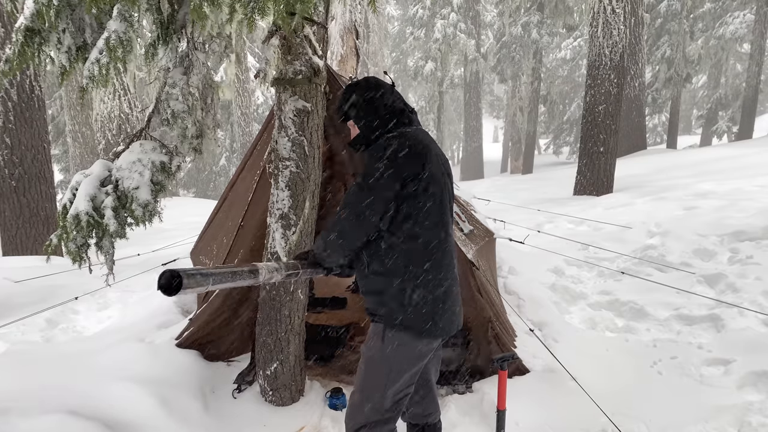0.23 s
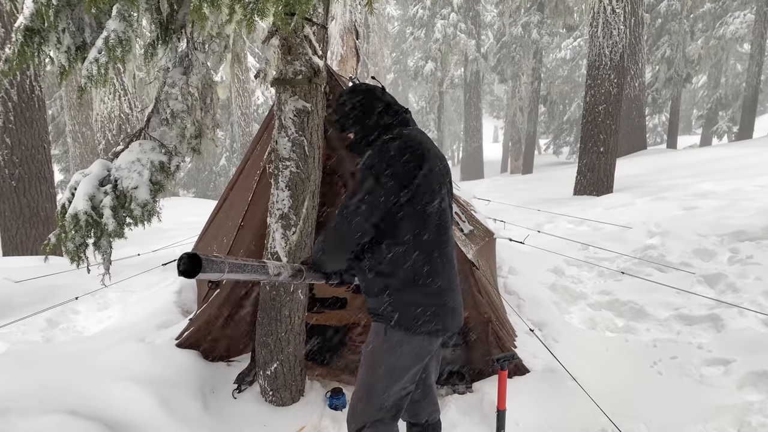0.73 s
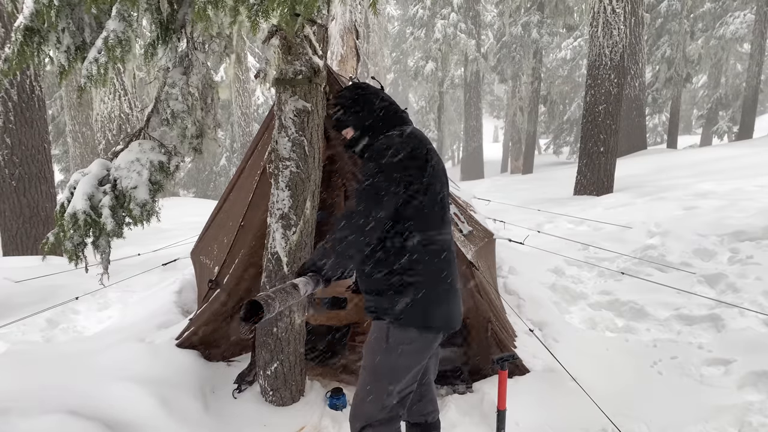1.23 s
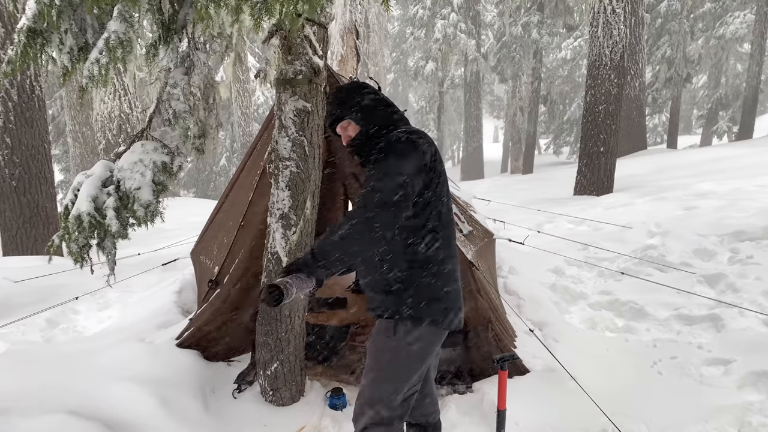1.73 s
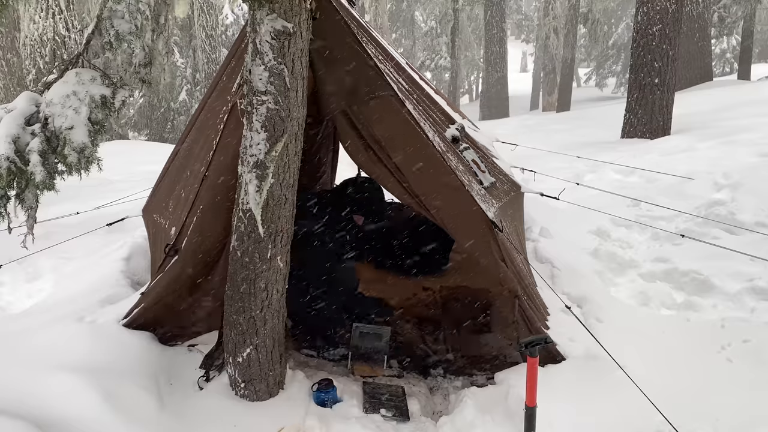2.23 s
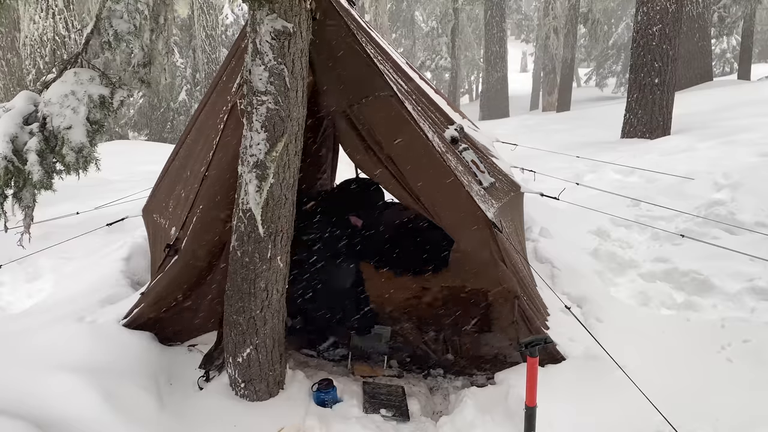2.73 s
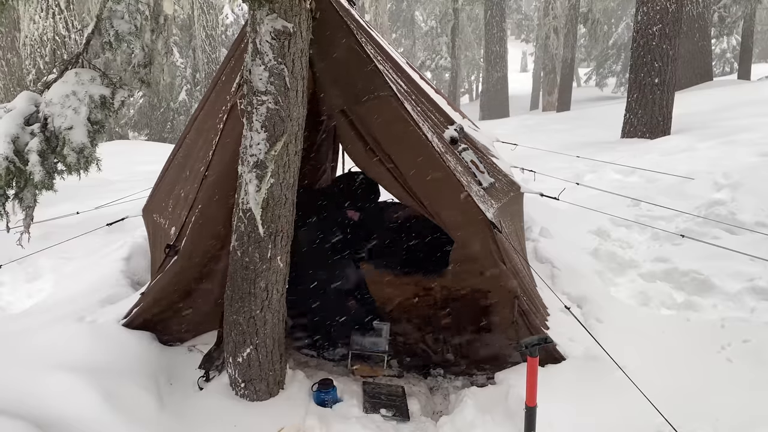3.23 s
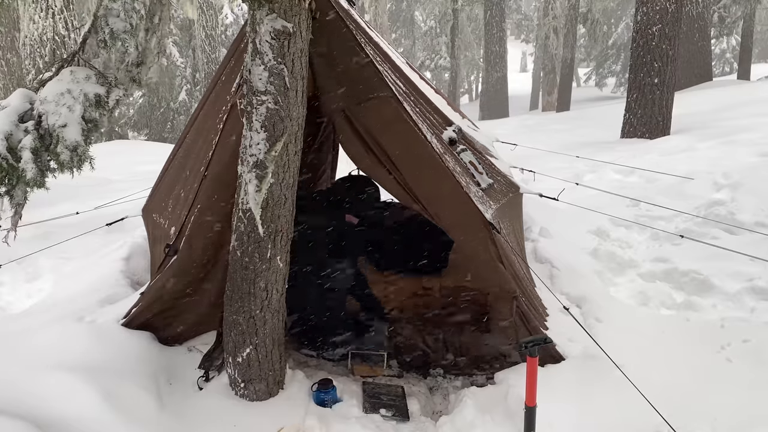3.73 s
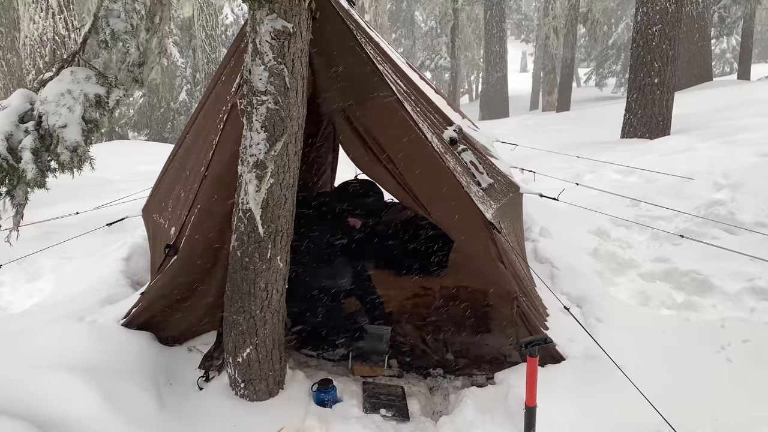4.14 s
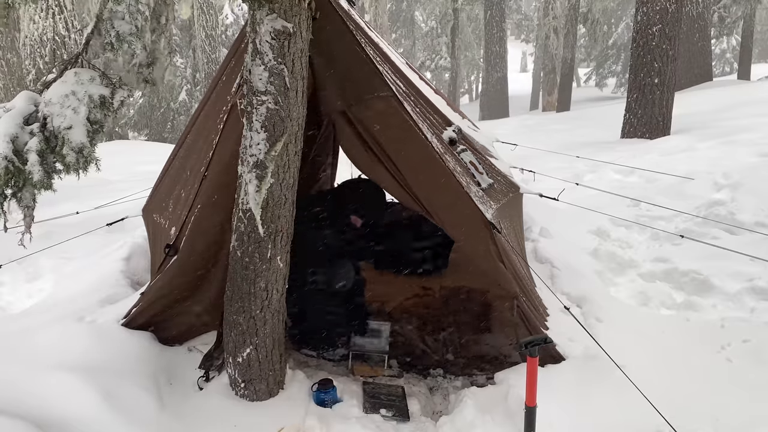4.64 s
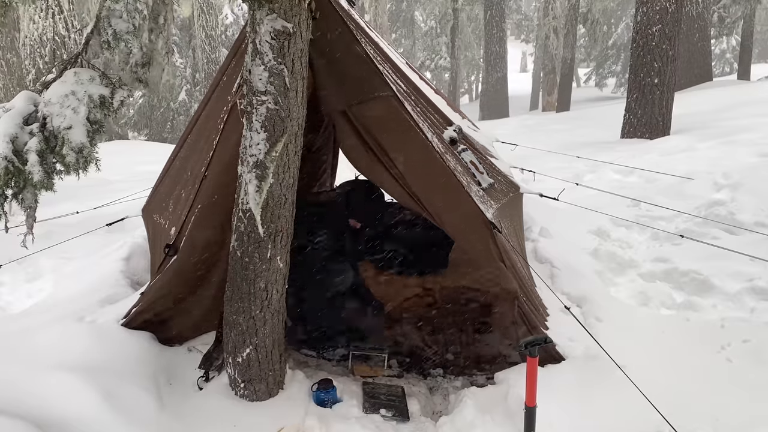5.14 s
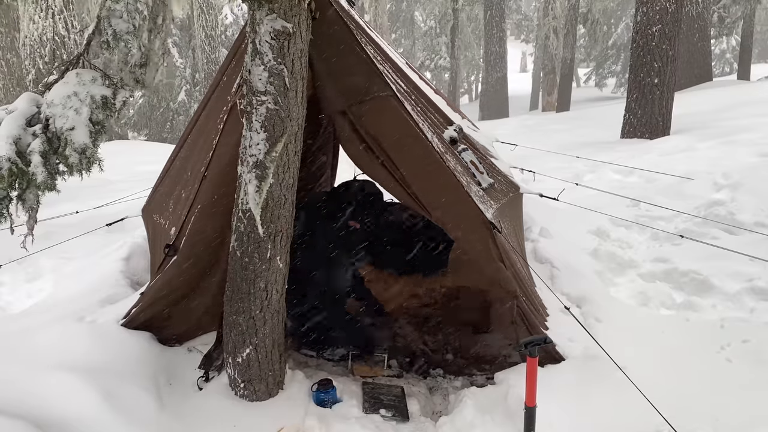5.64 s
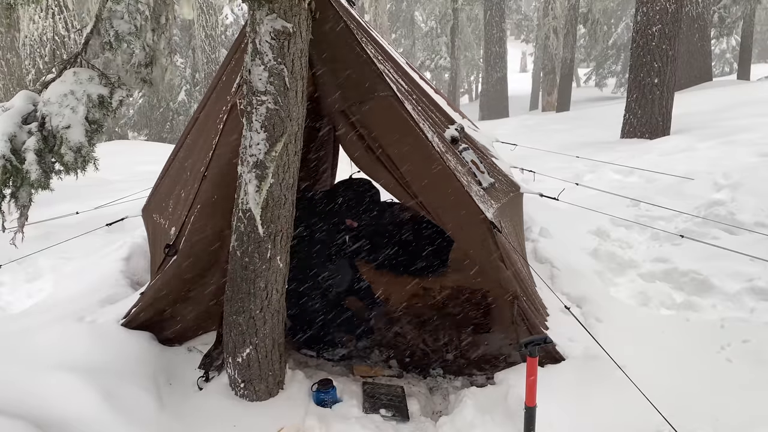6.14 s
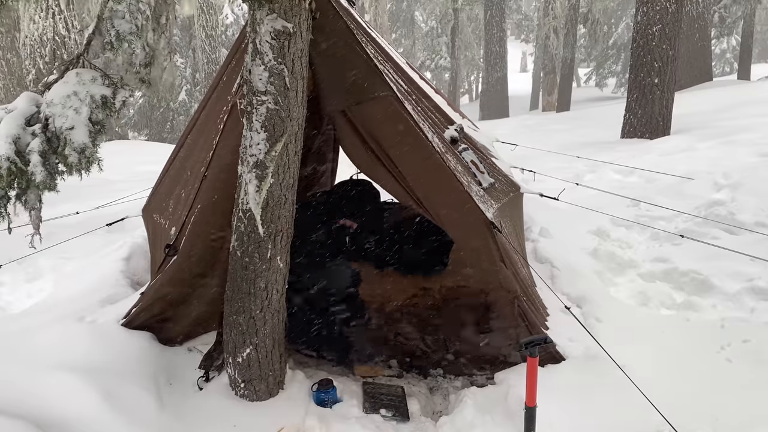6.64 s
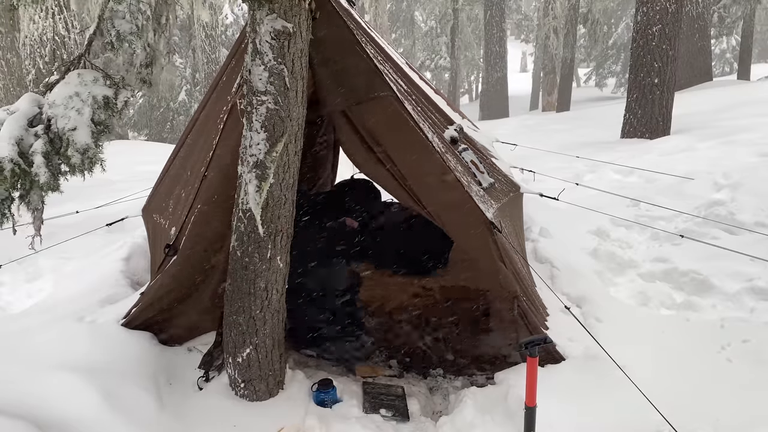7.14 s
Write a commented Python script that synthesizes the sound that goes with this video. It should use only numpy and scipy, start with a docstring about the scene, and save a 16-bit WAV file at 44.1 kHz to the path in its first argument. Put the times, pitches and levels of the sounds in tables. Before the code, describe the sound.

Tinny pipe scraping with sharp catches for two seconds, followed by woody cracks, hollow knocks and faint rustles amid hissing snow and low gusts.

```python
"""A thin steel stove pipe is slid into a tent in a snowy wood: stick-slip grains and catches ring its wall.
Then firewood is knocked about at the stove in the doorway: dry cracks, hollow bodies, rustles between.
Icy snow patters on the canvas all the while, as random grains and single pellets close by.
Gusts buffet the two microphone ports: low rumble, higher eddies and slaps, with dull taps at the microphone."""
import sys
import numpy as np
from scipy import signal
from scipy.fft import rfft, irfft
from scipy.io import wavfile

SR = 44100
rng = np.random.default_rng(int(sys.argv[2]) if len(sys.argv) > 2 else 0)


def dump_mix(stems):
    """Bounce the given channels to the path in sys.argv[1] as a 16-bit WAV at rate SR."""
    frames = np.atleast_2d(stems).T  # one column per channel
    limited = np.clip(frames, -1, 1)  # hard clip at full scale
    pcm = np.round(limited * 32767).astype(np.int16)
    wavfile.write(sys.argv[1], SR, pcm)


N = 325458
SIZE = 4096  # filter length in samples
TIME = np.arange(N) / SR  # s
FREQ = np.maximum(np.arange(SIZE // 2 + 1) * SR / SIZE, 1)  # Hz


def undb(db):
    """Decibels to gain."""
    return 10 ** (np.asarray(db) / 20)


def unit(x):
    """Scale to rms 1."""
    return x / np.sqrt(np.mean(x ** 2))


def curve(rows):
    """Gain over time from (s, dB) points."""
    return undb(np.interp(TIME, *np.array(rows).T))


def spectrum(rows, axis=1):
    """One column of a table over log frequency."""
    rows = np.array(rows)
    return np.interp(np.log(FREQ), np.log(rows[:, 0]), rows[:, axis])


def colour(x, gain):
    """Causal filter with the given shape over frequency; keeps the power of white noise."""
    # folding the cepstrum makes the filter minimum phase
    cepstrum = irfft(np.log(unit(gain) + 1e-9))
    cepstrum[1:SIZE // 2] *= 2
    cepstrum[SIZE // 2 + 1:] = 0
    response = irfft(np.exp(rfft(cepstrum)))
    return signal.oaconvolve(x, response)[:len(x)]


def resonances(modes):
    """Gain per frequency of damped modes (Hz, dB, t60 in s), summed in power."""
    power = 0
    for hz, db, t60 in modes:
        detuning = (FREQ ** 2 - hz ** 2) / FREQ * np.pi * t60 / np.log(1000)
        power = power + undb(db) ** 2 / (1 + detuning ** 2)
    return np.sqrt(power)


def walk(rate):
    """Random wander with spread 1, through `rate` new values a second."""
    knots = rng.standard_normal(4096)
    # straight lines between the knots lose a third of the variance
    return np.interp(TIME * rate, np.arange(len(knots)), knots) * np.sqrt(3 / 2)


def grains(rate, spread_db):
    """Random tiny impulses of unequal size, about `rate` a second, rms 1."""
    size = undb(spread_db * np.minimum(rng.exponential(size=N), 4))
    present = rng.random(N) < rate / SR
    return unit(present * size * rng.choice([-1, 1], N))


def add(track, s, sound):
    """Mix a sound into a track at time s."""
    start = max(int(s * SR), 0)
    track[start:start + len(sound)] += sound[:N - start]


def clatter(t60, rise, tail_db, tail_t60, rough_db=1.0):
    """A contact: uneven micro-impacts that die fast, then reflections from nearby."""
    t = TIME[:SR // 3]
    fade = np.hypot(undb(-60 * t / t60), undb(tail_db - 60 * t / tail_t60))
    unevenness = np.interp(t * 500, np.arange(len(t)), rng.uniform(-1, 1, len(t)))
    chatter = unit(undb(rough_db * unevenness))
    return rng.standard_normal(len(t)) * chatter * fade * (1 - np.exp(-t / rise))


def blips(rows, cycles):
    """Short wave packets (middle s, dB, Hz), swelling and fading over a few cycles or less."""
    track, t = np.zeros(N), TIME[:SR // 10] - 1 / 20
    for s, db, hz in rows:
        swell = np.exp(-np.minimum((t * hz / cycles) ** 2, 20))
        wave = np.sin(2 * np.pi * (hz * t + rng.random()))
        add(track, s + t[0], undb(db) * swell * wave)
    return track


def release(s, t60):
    """Gain 1 until time s, then an exponential fade, down to -120 dB."""
    return np.exp(-np.log(1000) * np.minimum(np.maximum(TIME - s, 0) / t60, 2))


# Pushes of the hand on the pipe.
# Each row: time of full force in seconds, hold in seconds, relative level in dB, release t60 in seconds.
PUSHES = [(0, .02, -43.5, 0.5), (0.083, .02, -40.5, .4), (0.117, .17, -36.5, 0.49),
          (0.773, .02, -41.5, 0.32), (0.936, .2, -36, .5), (1.123, 0.097, -33, 0.98),
          (1.316, 0.2, -33.5, 0.79), (1.575, .2, -33, 1)]
PUSH_ATTACK_S = 0.026
REST_DB, STOP_S, STOP_T60_S = -53.5, 1.975, .18  # light rubbing between pushes; the pipe comes to rest


def pushing():
    """Force on the pipe: each push builds, holds and eases off, until the pipe stops."""
    force = np.full(N, undb(REST_DB))
    for s, hold, db, t60 in PUSHES:
        attack = np.exp(np.minimum(TIME - s, 0) / PUSH_ATTACK_S)
        force = np.maximum(force, undb(db) * attack * release(s + hold, t60))
    return force * release(STOP_S, STOP_T60_S)


# The pipe catches on its way in.
# Each row: start in seconds, relative level in dB, t60 of the first decay in seconds.
CATCHES = [(0.113, -28, 0.039), (.284, -47, .04), (.296, -33, .04), (0.379, -31.5, .03),
           (0.385, -27, 0.028), (.444, -32, 0.024), (0.463, -33.5, .03), (.497, -39, 0.18),
           (0.753, -42, .2), (0.819, -38, 0.05), (.871, -38.5, 0.12), (0.914, -14.5, 0.039),
           (.958, -31, 0.042), (1.001, -30, 0.037), (1.026, -23, 0.056), (1.04, -28, .025),
           (1.076, -27, 0.053), (1.101, -23.5, 0.11), (1.148, -14, 0.063), (1.192, -25, 0.11),
           (1.341, -23.5, .04), (1.376, -29, 0.043), (1.405, -25, 0.083), (1.459, -29, 0.061),
           (1.522, -27, 0.031), (1.833, -22, 0.065), (1.958, -32.5, 0.066), (2.136, -45, 0.17)]
# Tone of the pipe's skin. Each row: frequency in Hz, relative level in dB.
PIPE_COLOUR = [(80, -69), (180, -8.5), (240, -8), (400, -10.5), (700, -6.5), (1200, -4.5), (2000, -4),
               (3300, -3.5), (4600, -2), (7000, -6.5), (9500, -4.5), (12000, -8), (15500, -10)]
# Ring of the pipe wall. Each row: frequency in Hz, relative level in dB, decay t60 in seconds.
PIPE_MODES = [(494, 0, 0.07), (1272, -1, 0.15), (3050, -4.5, .04), (4060, -3, 0.023), (4370, -5, 0.023),
              (4740, 1, 0.0045), (9060, -7, 0.0039)]
# How freely the pipe wall rings. Each row: time in seconds, relative level in dB.
WALL_FREEDOM = [(0, -12), (.12, 0), (.22, -10), (.6, 5.5), (.95, -8), (1.23, 0), (1.33, -4), (1.65, 3),
                (1.9, -4)]


def pipe():
    """Stick-slip grains and sudden catches both ring the thin steel wall."""
    drive = pushing() * undb(.5 * walk(61.45))
    rub, slip = (grains(rate=7000, spread_db=2.5) * drive * undb(1.2 * walk(170)) for _ in range(2))
    catches = np.zeros(N)
    for s, db, t60 in CATCHES:
        add(catches, s, undb(db) * clatter(t60, rise=0.00074, tail_db=-10.5, tail_t60=0.12))
    skin = undb(spectrum(PIPE_COLOUR))
    ring = skin * resonances(PIPE_MODES)
    # the contact point travels along the pipe and favours the low and the high modes in turn
    low = 1 / np.hypot(1, (FREQ / 4200) ** 8)
    free = slip * curve(WALL_FREEDOM)
    singing = sum(colour(free * undb(3 * walk(12)), ring * part) for part in (low, 1.02 - low))
    scrape = undb(2.5) * colour(rub, skin) + undb(-7.5) * singing
    # a catch bends the wall further than a slip does, so it rings more
    clank = np.hypot(skin, undb(4.5) * ring)
    clank = clank / np.hypot(1, FREQ / 13000) / np.hypot(1, 600 / FREQ)
    return scrape + undb(1) * colour(catches, clank)


# Strength of the snowfall. Each row: time in seconds, relative level in dB.
SNOW = [(2.05, -53), (2.15, -48), (3.93, -48), (4.8, -47.5), (5.33, -43), (5.95, -46.5), (7.38, -46.5)]
# Tone of the snow. Each row: frequency in Hz, relative level in dB.
SNOW_COLOUR = [(100, 1), (300, -0.5), (600, -2), (1100, -4.5), (2500, -2), (4400, 1), (5700, 1.5),
               (7500, -2), (10000, -4.5), (13000, -9), (15500, -14)]
# Single ice pellets land close by. Each row: start in seconds, relative level in dB, pitch in Hz.
PELLETS = [(2.445, -38, 4930), (2.579, -36, 4000), (3.217, -43, 5000), (3.542, -35.5, 6100),
           (4.456, -44, 4500), (4.75, -45, 5000), (4.935, -38, 3480), (5.255, -41, 4500),
           (5.586, -33, 5500), (5.851, -41, 3500), (5.869, -38, 4500), (6.031, -35, 4000),
           (6.065, -37, 4500), (6.152, -35, 7500), (6.369, -36, 5000), (6.836, -38.5, 6500),
           (6.924, -34, 4970)]


def snowfall():
    """Countless icy grains hiss on canvas and trees; a few tick close to one port or the other."""
    flow, tone = curve(SNOW) * undb(.5 * walk(29)), undb(spectrum(SNOW_COLOUR))
    mid, side = (grains(rate=8000, spread_db=4.0) for _ in range(2))
    mid = undb(-0.1) * colour(mid, tone)
    side_tone = tone * np.hypot(1, undb(7.0) * resonances([(9000, 0, 0.0023)]))
    side = undb(1) * colour(side, side_tone)
    # sparser, more unequal grains, separate at each port
    patter_tone = tone * resonances([(4700, 0, 0.0011)])
    patter = np.array([colour(grains(rate=90, spread_db=7.0), patter_tone) for _ in range(2)])
    near = np.zeros((2, N))
    for (s, db, hz), pan_db in zip(PELLETS, 3 * rng.standard_normal(len(PELLETS))):
        # each pellet rings for a few cycles where it lands
        ring = resonances([(hz, 0, 4 / hz)]) ** 2
        tick = undb(db + 16) * colour(signal.unit_impulse(SIZE), ring)
        add(near[0], s, tick * undb(pan_db))
        add(near[1], s, tick * undb(-pan_db))
    return flow * (np.array([mid + side, mid - side]) + undb(-7.5) * patter) + near


# Steady breeze on the microphone. Each row: time in seconds, relative level in dB.
BREEZE = [(0, -79), (.2, -70), (.35, -44.5), (.68, -49), (.98, -57), (1.06, -70), (1.9, -69), (2.22, -59),
          (2.75, -55), (3.3, -53), (4.3, -47), (4.9, -40), (5.4, -43), (5.7, -60), (5.98, -44.5),
          (6.85, -44), (7.38, -49)]
# Gusts on top of the breeze. Each row: peak in seconds, relative level in dB, length in seconds.
GUSTS = [(2.868, -43, 0.059), (3.118, -35.5, .04), (3.6, -44.5, .1), (3.826, -26, .14), (4.1, -29, 0.058),
         (4.233, -35, 0.031), (4.44, -35, .14), (4.614, -30.5, 0.063), (4.775, -34.5, 0.11),
         (5.101, -29, 0.051), (5.232, -38, 0.12), (5.547, -27.5, 0.029), (6.115, -43.5, 0.092),
         (6.315, -35, .07), (6.48, -31.5, .17), (6.697, -34, 0.049), (6.927, -38, 0.16), (7.19, -39, 0.082)]
GUST_RISE, GUST_FALL = 0.41, 0.72  # time constants as shares of a gust's length


def gusting():
    """Wind strength: gusts swell quickly and die away over the breeze, adding in power."""
    power = curve(BREEZE) ** 2
    for s, db, length in GUSTS:
        age = (TIME - s) / length
        shape = np.where(age < 0, (age / GUST_RISE) ** 2, age / GUST_FALL)
        power = power + (undb(db) * np.exp(-np.minimum(shape, 20))) ** 2
    return np.sqrt(power)


# Tone of the wind rumble at the microphone. Each row: frequency in Hz, relative level in dB.
WIND_COLOUR = [(20, -32), (40, -11.5), (65, -4), (100, -0.5), (160, -6), (250, -17.5), (400, -33),
               (800, -57), (3000, -95)]
# Single eddies slap the ports. Each row: middle in seconds, relative level in dB, pitch in Hz.
BUFFETS = [(3.82, -21, 88.4), (5.078, -30.5, 193), (5.552, -29.5, 130)]
# Dull taps right at the microphone. Each row: middle in seconds, relative level in dB, pitch in Hz.
TAPS = [(.346, -26, 310), (.727, -37, 593), (2.008, -37, 254), (2.34, -41.5, 290), (3.456, -26, 560),
        (3.702, -34.5, 447), (7.195, -30.5, 690)]


def wind():
    """Turbulence rumbles and dull taps land on the ports, the rumble partly alike, all more on the windward left."""
    rumble_tone = undb(spectrum(WIND_COLOUR))
    shared, left, right = (colour(rng.standard_normal(N), rumble_tone) for _ in range(3))
    gust = gusting()
    rumble = gust * (undb(-3.5) * shared + undb(-0.5) * np.array([left, right]))
    # strong gusts break into smaller, higher eddies
    swirl = colour(rng.standard_normal(N), resonances([(244, 0, 0.0084)]) ** 3)
    eddies = gust * (gust / gust.max()) ** 0.33 * swirl
    slaps_and_taps = blips(BUFFETS, cycles=2.76) + blips(TAPS, cycles=0.45)
    port_gain = undb(np.array([[1.7], [-2.8]]))  # left, right
    return (rumble + undb(-14) * eddies + slaps_and_taps) * port_gain


# Firewood knocks at the stove.
# Each row: start in seconds, relative level in dB, hollow body in dB, treble in dB,
# decay t60 of the crack in seconds, rise in seconds, lower ring in Hz, upper ring in Hz.
KNOCKS = [(2.596, -38.5, 11.5, -4, 0.038, 0.0007, 4400, 4700),
          (2.618, -31, -4, 11, 0.059, .0003, 7400, 8100), (2.633, -26.5, 0, 5, 0.06, 0.0013, 496, 7800),
          (2.638, -21.5, -4.5, 10.5, 0.06, 0.00052, 4200, 13100),
          (2.696, -30.5, 2, -4, 0.073, 0.00037, 950, 1110),
          (2.797, -24.5, -2, -2.5, 0.083, 0.00068, 1020, 3280),
          (2.994, -24.5, -24, -6.5, 0.065, 0.0005, 1210, 2570),
          (3.004, -30, 2, 6, 0.053, 0.00065, 2690, 4240), (3.093, -25, 0, 2.5, 0.076, 0.0003, 1150, 2680),
          (3.336, -14.5, 8.5, 1, 0.042, 0.0013, 756, 2250), (3.346, -21, 10, -5, 0.059, 0.00029, 690, 800),
          (3.907, -37.5, 5, -10, 0.02, 0.00042, 1400, 3060),
          (4.038, -37.5, 13.5, -6, 0.086, 0.00053, 890, 1350),
          (4.090, -35, -4, -17, 0.14, 0.0017, 1000, 4000), (4.100, -22, 3, 6, 0.082, 0.00046, 2340, 4020),
          (4.11, -35, -4, -6, 0.054, 0.00089, 640, 4000), (4.616, -35.5, -5, 0, 0.063, 0.00087, 2440, 4600),
          (4.780, -18.5, -9, 6.5, 0.033, 0.00099, 3040, 4400),
          (4.802, -30, 6, 11, 0.041, 0.002, 2700, 4220), (5.129, -14.5, 0, 3, 0.058, 0.00012, 1870, 3700),
          (5.496, -19, -3.5, 6, 0.072, 0.00028, 1550, 2500),
          (6.544, -24.5, 14, -1, 0.093, 0.0026, 1360, 2310), (6.57, -34, 11, -1, 0.11, 0.0013, 1080, 2260),
          (7.28, -27, 11, 0.5, 0.17, 0.002, 1290, 2020), (7.297, -28.5, 9, -15, .07, 0.0019, 507, 2750)]
# Gear is dragged and a sleeve rustles.
# Each row: middle in seconds, half length in seconds, relative level in dB, hollow body in dB.
RUSTLES = [(2.166, 0.054, -45.5, -11), (2.985, 0.023, -49, 5), (3.277, 0.15, -49, -8.5),
           (3.513, 0.026, -52.5, -16), (3.605, 0.12, -56.5, 3.5), (3.751, 0.066, -42, -2.5),
           (4.524, 0.026, -48, -4), (5.944, 0.14, -52, -5), (6.268, 0.017, -46, -10),
           (6.538, 0.026, -46, 8), (6.969, 0.064, -49.5, 2.5), (7.184, 0.079, -60, 4)]
# Tone of the dry wood. Each row: frequency in Hz, relative level in dB.
WOOD_COLOUR = [(150, -17.5), (400, -8.5), (520, -11.5), (800, -3), (1300, -4), (2200, -3), (4200, -2.5),
               (7000, -8.5), (10000, -7), (15500, -22)]
# Hollow ring of logs and firebox. Each row: frequency in Hz, relative level in dB, decay t60 in seconds.
WOOD_MODES = [(506, 1, 0.032), (576, 7, 0.09), (632, -6.5, 0.04), (711, 0, 0.17), (892, -3, 0.11),
              (1003, -9.5, 0.061)]


def firewood(ring_db=8.5, cycles=38):
    """A knock is a dry crack with two rings, a splintery edge and a hollow body; dragging stirs the same wood."""
    crack, body, stroke, stirred = np.zeros((4, N))
    wood, high = undb(spectrum(WOOD_COLOUR)), 1 / (1 + (6500 / FREQ) ** 4)
    for s, db, body_db, treble_db, t60, rise, lower_hz, upper_hz in KNOCKS:
        rings = resonances([(hz, ring_db, cycles / hz) for hz in (lower_hz, upper_hz)])
        blow = undb(db) * clatter(t60, rise, tail_db=-11.0, tail_t60=0.21)
        add(crack, s, colour(blow, wood * np.hypot(1, rings) * undb(treble_db * high)))
        # the hollow body is struck by a shorter contact
        thump = clatter(t60 * 0.6, rise, tail_db=-9.5, tail_t60=0.19)
        add(body, s, undb(db + body_db) * thump)
    for s, length, db, body_db in RUSTLES:
        swell = undb(db) * np.hanning(int(2 * length * SR))
        add(stroke, s - length, swell)
        add(stirred, s - length, swell * undb(body_db))
    drag = grains(rate=2100, spread_db=1.5)
    rustle = colour(drag * stroke, wood / np.hypot(1, FREQ / 6000))
    hollow = resonances(WOOD_MODES) / np.hypot(1, (450 / FREQ) ** 6) / np.hypot(1, FREQ / 3000)
    return crack + rustle + colour(undb(-10) * body + drag * stirred, hollow)


# Sound from the tent at the two microphone ports.
# Each row: frequency in Hz, side minus mid in dB, left minus right in dB.
PORTS = [(200, -13, 2.5), (650, -10.5, 4), (1300, -5, 6), (2720, -16.5, -2), (4470, -6, 4.5),
         (6000, -2, 10.5), (7600, 6, -2.5), (9500, -4, -3), (12000, -3.5, -3), (13900, -34, 0)]


def at_ports(x, scatter_s=0.00059):
    """The camera body shades one port and scatters the treble differently into each."""
    side, lean = undb(spectrum(PORTS, axis=1)), undb(spectrum(PORTS, axis=2)) ** 2
    direct = (1 + side ** 2) / 2 * (lean - 1) / (lean + 1)
    # a quarter-cycle turn widens the sound without tipping it to one side
    burst = rng.standard_normal(SIZE) * np.exp(-np.minimum(TIME[:SIZE] / scatter_s, 20))
    turn = rfft(burst).real
    sign = np.tanh(10 * turn / np.std(rfft(burst)))
    scatter = 1j * sign * np.sqrt(np.maximum(side ** 2 - direct ** 2, 0))
    response = np.roll(irfft(direct + undb(-1.5) * scatter), SIZE // 2)
    # dropping half the filter length undoes its delay
    difference = signal.oaconvolve(x, response)[SIZE // 2:][:N]
    return np.array([x + difference, x - difference])


def scene():
    """Handling at the tent, under snow and wind."""
    return at_ports(pipe() + firewood()) + snowfall() + wind()


TOP_HZ = 15850


def record(dry):
    """The camera cuts the top: a steep low-pass filter at TOP_HZ."""
    return signal.sosfilt(signal.ellip(10, .2, 80, TOP_HZ, fs=SR, output="sos"), dry)


dry = scene()
out = record(dry)
dump_mix(out)
```